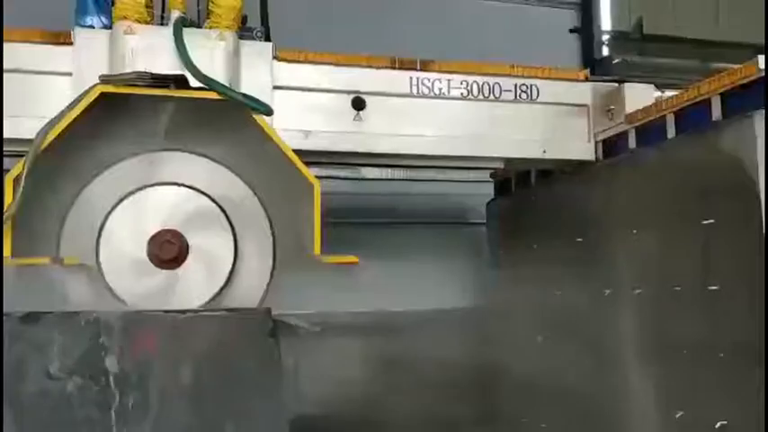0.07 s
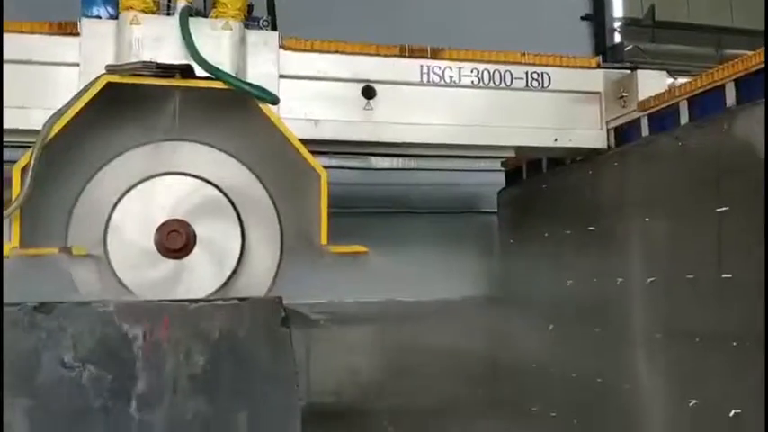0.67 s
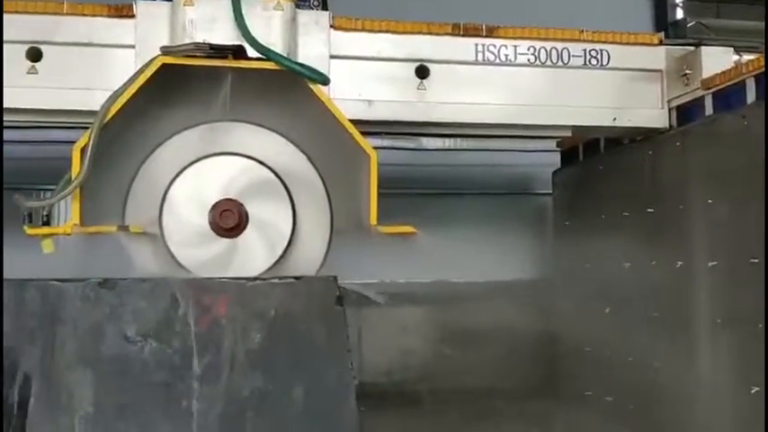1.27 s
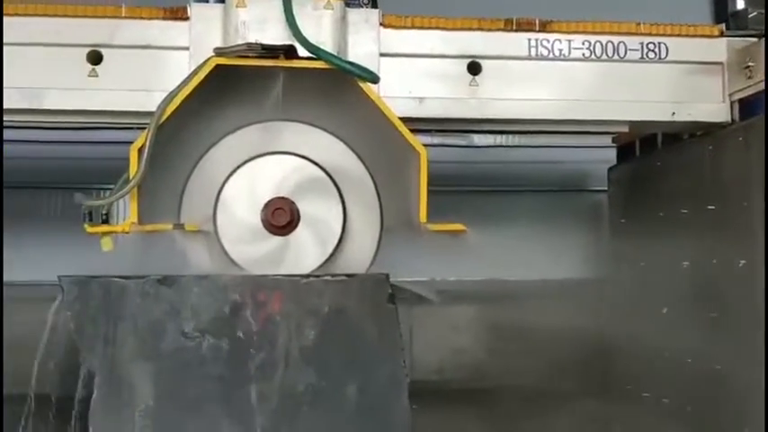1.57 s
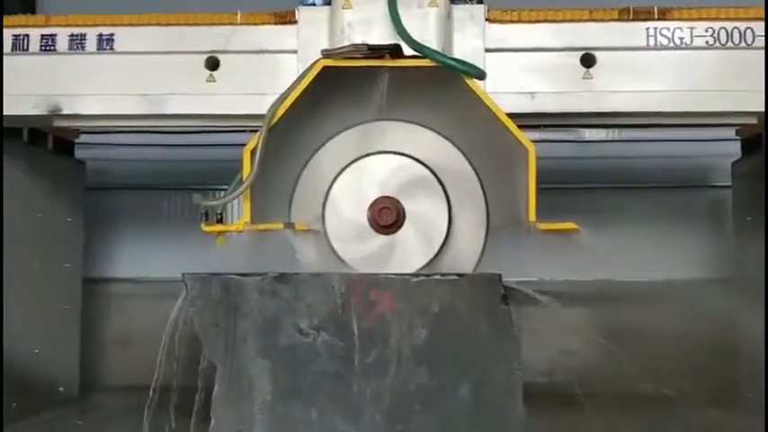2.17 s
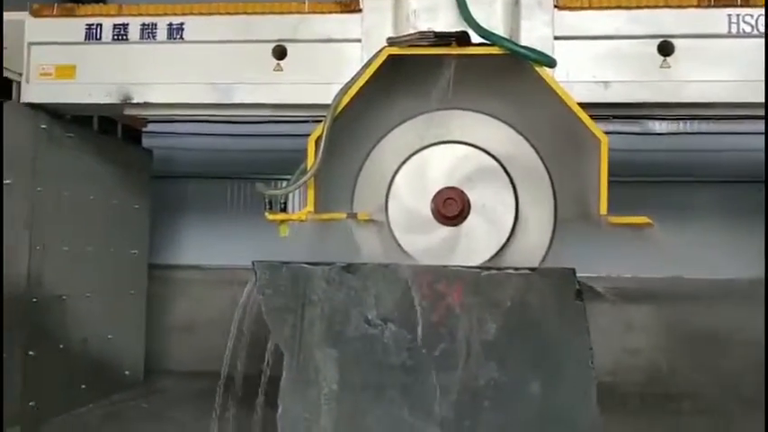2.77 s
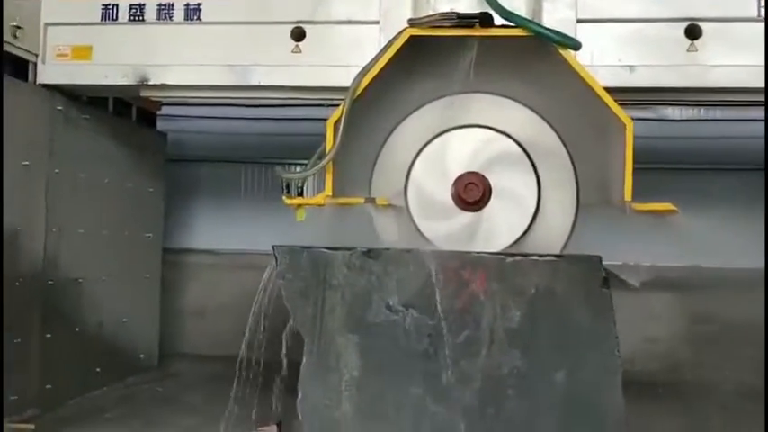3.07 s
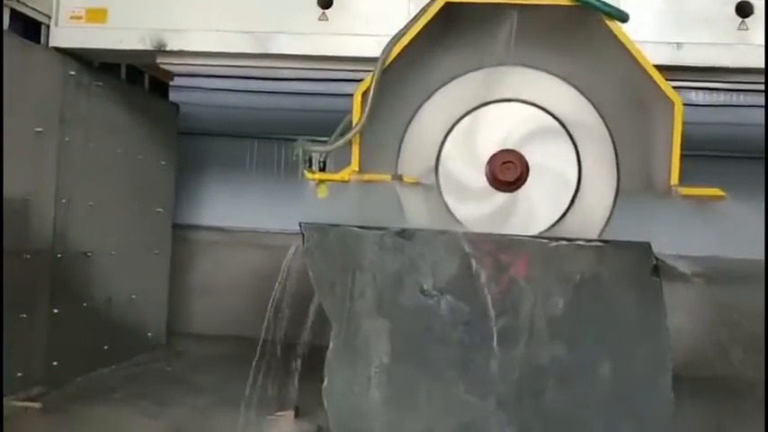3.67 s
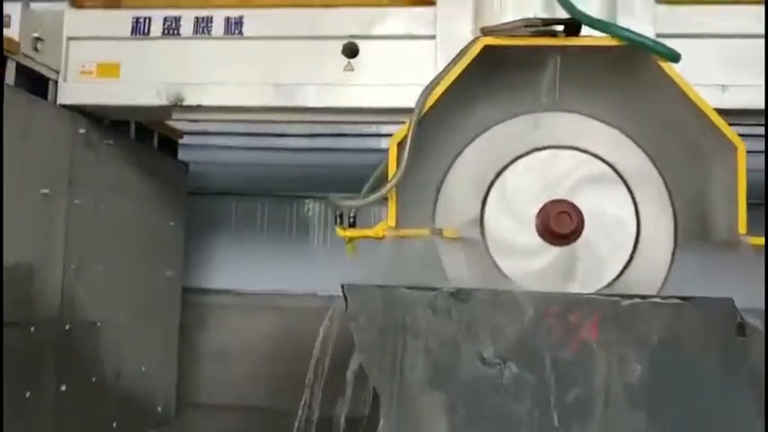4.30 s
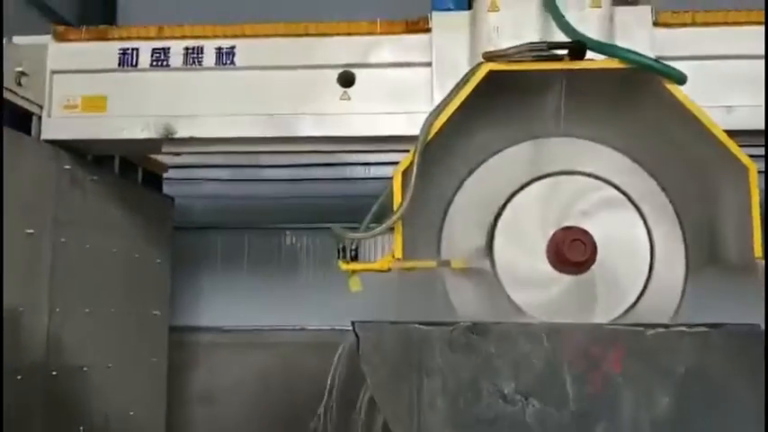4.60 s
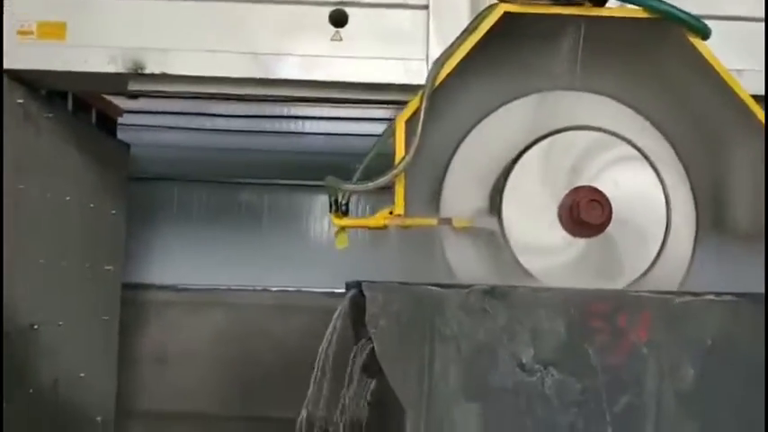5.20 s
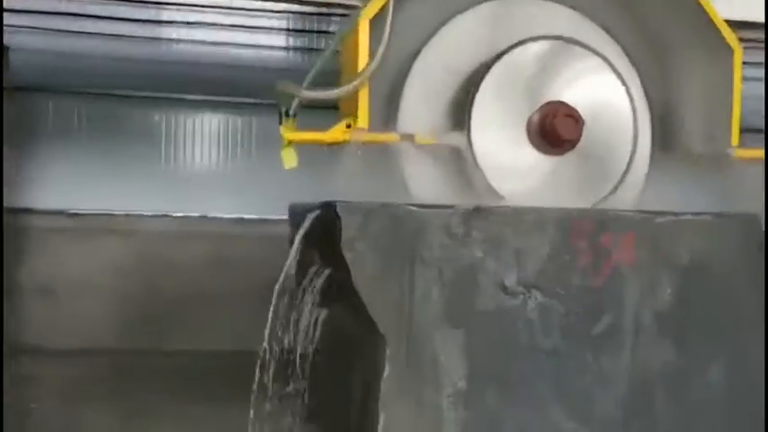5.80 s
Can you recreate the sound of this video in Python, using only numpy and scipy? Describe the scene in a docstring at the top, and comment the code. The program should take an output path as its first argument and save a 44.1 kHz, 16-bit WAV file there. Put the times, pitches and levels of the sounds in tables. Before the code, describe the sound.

A big circular saw cuts a wet stone block in a factory hall, heard from a few metres away. Harsh, gritty grinding and the bright hiss of cooling water run without a break. The steel blade rings and howls with a slowly sliding pitch, while a fast, repeating throb and a motor drone sit underneath. A midrange growl swells past the middle, and a few soft low knocks come through.

```python
"""Crushing stone and hissing water: a big circular saw cuts a wet block in a factory hall.
The microphone is a phone carried slowly past, 3.8 m away at its closest. Diamond grit cracks the stone,
the steel sings, cooling water sprays off the rim and the slot howls. High spots of the rim thump the
blade in the same rhythm on every turn, the flank rubs and whines, and the drive drones underneath,
with a deep rumble at the microphone and a few soft knocks."""
import sys
import numpy as np
from scipy import signal
from scipy.fft import rfft, irfft
from scipy.io import wavfile
from scipy.ndimage import uniform_filter1d, map_coordinates

SR = 44100
rng = np.random.default_rng(int(sys.argv[2]) if len(sys.argv) > 2 else 0)


def pcm_store(signal):
    """Save signal as 16-bit PCM."""
    levels = np.round(np.clip(np.atleast_2d(signal), -1, 1) * 32767)
    wavfile.write(sys.argv[1], SR, levels.astype(np.int16).T)


N = 266805
TIME = np.arange(N) / SR
BIN_HZ = np.maximum(np.arange(N // 2 + 1) * SR / N, 1)
TURN_HZ = 5.2604


def undb(db):
    """Decibels to gain."""
    return 10 ** (np.asarray(db) / 20)


def level(x, db):
    """Scale to unit rms, then apply a steady or moving gain in dB."""
    return x * undb(db) / np.sqrt(np.mean(x ** 2))


def curve(rows):
    """Join (second, value) rows by straight lines."""
    return np.interp(TIME, *np.transpose(rows))


def swells(rows):
    """Smooth rises and dips in dB, one for each row."""
    return sum(db * np.exp(-((TIME - at_s) / half_s) ** 2) for at_s, half_s, db in rows)


def wander(rate_hz):
    """Smooth random drift with a spread near 1."""
    hold = int(SR / rate_hz)
    steps = np.repeat(rng.standard_normal(N // hold + 1), hold)
    return 1.36 * uniform_filter1d(uniform_filter1d(steps, hold), hold)[:N]


def colour(x, points):
    """Filter by a spectrum of (Hz, dB) points."""
    hz, db = np.transpose(points)
    return irfft(rfft(x) * undb(np.interp(np.log(BIN_HZ), np.log(hz), db)), N)


def ring(x, modes):
    """Drive a bank of resonances; neighbours swing in opposite directions."""
    response = sum((-1) ** k * undb(db) / (1 + 1j * (BIN_HZ ** 2 - hz ** 2) / (BIN_HZ * width))
                   for k, (hz, width, db) in enumerate(modes))
    return irfft(rfft(x) * response, N)


def grains(per_s, spread_db):
    """Dense clicks of unequal size and either sign."""
    clicks = (rng.random(N) < per_s / SR) * np.sign(rng.standard_normal(N))
    return level(clicks * undb(spread_db * np.minimum(rng.exponential(size=N), 4)), 0)


def roughness(turn, fresh_db):
    """A rough profile that comes round on every turn, plus a share of fresh noise."""
    size = 2 * int(SR / TURN_HZ / 2)
    profile = irfft(np.exp(2j * np.pi * rng.random(size // 2 + 1)))
    repeated = map_coordinates(profile, [turn % 1 * size], order=1, mode="grid-wrap")
    return level(level(repeated, 0) + undb(fresh_db) * rng.standard_normal(N), 0)


def passing(abreast_s, closest_m=3.8, stroll_m_s=0.46):
    """Gain at the moving microphone: 1 abreast of the source, falling as 1 / distance."""
    return closest_m / np.hypot(closest_m, stroll_m_s * (TIME - abreast_s))


# Crushed stone at the cut. Each row: frequency in Hz, gain in dB.
GRIT_SPECTRUM = [(300, -36), (600, -20.5), (900, -11), (1300, -8.5), (1700, -3.5), (2100, -4.5), (2700, -3),
                 (3250, -5.5), (3900, -4), (4450, -2.5), (4950, -7), (6000, -14), (9000, -25)]
# The singing steel disc. Each row: pitch in Hz, width in Hz, gain in dB.
STEEL_MODES = [(1920, 230, -10), (2026, 107, -3), (2260, 22, -3), (2440, 190, -5), (4180, 190, 1)]

def grinding(force):
    """Grit cracks the stone in tiny bursts; the same uneven load keeps the steel singing."""
    load = force ** 0.051 * undb(0.44 * wander(25.29) + 0.34 * wander(180))
    crush = colour(load * grains(per_s=12000, spread_db=2.5), GRIT_SPECTRUM)
    sing = sum(ring(load * grains(per_s=9000, spread_db=2), [mode]) * undb(wander(6.4))
               for mode in STEEL_MODES)
    sing = colour(sing, [(700, 8), (1600, -3), (4700, -8), (6000, 2.5)])
    return level(level(crush, 0) + level(sing, -9.5), -13.5) * passing(abreast_s=4.5)


# Water off the rim. Each row: frequency in Hz, gain in dB.
SPRAY_SPECTRUM = [(2500, -33), (5300, -8), (6200, -1.5), (7000, 0), (7800, 4.5), (9000, 2), (10400, 2.5),
                  (11000, 4), (11700, 2), (12300, -7), (13300, -3.5), (14000, -6.5)]
# The spray along the walk. Each row: time in seconds, level in dB.
SPRAY_LEVELS = [(.5, -15.5), (3.15, -15), (3.9, -17), (4.9, -15.5), (5.5, -18)]

def spray(force):
    """Water flung off the rim bursts into droplets; the jet flutters."""
    flow = force ** 0.052 * undb(0.4 * wander(16) + 0.49 * wander(150))
    droplets = flow * grains(per_s=22000, spread_db=2.5)
    return level(colour(droplets, SPRAY_SPECTRUM), curve(SPRAY_LEVELS))


# The slot in the block. Each row: time in seconds, pitch in Hz, level in dB.
HOWL_PATH = [(0.699, 2283, -20), (1.601, 2205, -24), (2.1, 2163, -23.5), (2.55, 2000, -20.5),
             (3.1, 1978, -24), (3.65, 1926, -23), (4.301, 2071, -21), (4.9, 2397, -29), (5.499, 2670, -27),
             (5.999, 2310, -23)]

def howl(corner_hz=405):
    """Grit stirs a broad resonance of the slot, whose pitch slides as the blade travels."""
    at_s, hz, db = np.transpose(HOWL_PATH)
    grit = grains(per_s=8000, spread_db=1.5)
    stir = irfft(rfft(grit) / (1 + 1j * BIN_HZ / corner_hz) ** 2, N)
    phase = 2 * np.pi * np.cumsum(np.interp(TIME, at_s, hz)) / SR
    return level(stir * np.sin(phase), np.interp(TIME, at_s, db))


def rubbing(scrape, modes, level_db, flutter_db):
    """The flank scrapes in the slot and rings a few modes, each fed from its own place on the disc."""
    out = 0
    for hz, width, db in modes:
        feed = np.roll(scrape, rng.integers(N))
        wide = 1.55 * width  # two passes narrow the band back to its width
        mode = ring(ring(feed, [(hz, wide, db)]), [(hz, wide, 0)])
        out = out + mode * undb(flutter_db * wander(9))
    return level(out, level_db)


# High and lower rings of the rubbed disc. Each row: pitch in Hz, width in Hz, gain in dB.
HIGH_ZING_MODES = [(4340, 50, 0), (4450, 55, -0.5), (4540, 55, -1.5)]
LOW_ZING_MODES = [(3852, 150, 0)]
# The disc binds or runs free. Each row: centre in seconds, half-length in seconds, change in dB.
BINDING = [(.46, .06, 5), (2.1, 0.073, 2), (2.35, .07, -6), (2.49, 0.046, 5.5), (2.61, 0.046, -9),
           (3.37, 0.064, 5), (3.62, 0.22, 1.5), (5.03, .18, -6), (5.8, 0.31, -3)]
# The lower ring along the walk. Each row: time in seconds, level in dB.
LOW_ZING_LEVELS = [(.65, -28), (.87, -24), (1.1, -25), (2.3, -28), (3.3, -36), (3.75, -38), (3.9, -27),
                   (5.35, -29), (5.9, -33)]

def zing(scrape):
    """The rubbed disc rings in two bands; the higher one flares where the disc binds."""
    high = rubbing(scrape, HIGH_ZING_MODES, -24.5 + swells(BINDING), flutter_db=1.8)
    low = rubbing(scrape, LOW_ZING_MODES, curve(LOW_ZING_LEVELS), flutter_db=2.3)
    return high + low


# The early, middle and late stages of the cut. Each entry: time in seconds.
WEAR_TIMES = [1.1, 2.8, 5]

def wear(stage_db):
    """Gain of a spot that grows or wears down as the cut advances."""
    return undb(np.interp(TIME, WEAR_TIMES, stage_db))


def swings(turn, spots, drift_turns, drift_hz, scatter_db):
    """Each spot swings the blade for a few cycles, a little early or late and never equally hard."""
    out = 0
    for place, half_length, hz, *stage_db in spots:
        turns_past = (turn - place + drift_turns * wander(drift_hz) + .5) % 1 - .5
        strength = wear(stage_db) * undb(scatter_db * wander(5.3))
        envelope = strength * np.exp(-(turns_past / half_length) ** 2)
        out = out + envelope * np.sin(2 * np.pi * hz * turns_past / TURN_HZ)
    return out


# High spots of the rim. Each row: place and half-length in turns, pitch in Hz,
# then early, middle and late strength in dB.
RIM_SPOTS = [(.032, 0.036, 267, -7, -6, -2.5), (0.104, .036, 272, -4, -6, -4),
             (.213, .042, 256, -4, -3, -2), (.306, .049, 255, -2.5, -1.5, 1),
             (.42, 0.044, 255, -10, -4.5, -1.5), (.53, .05, 251, -2.5, -0.5, -1.5),
             (.594, 0.036, 253, -2.5, 2, 1), (0.711, 0.027, 277, -9, -11, -6),
             (.78, 0.038, 250, -8, -4.5, -7), (0.974, 0.049, 254, -6.5, -2.5, -3.5)]

def thumps(turn):
    """Each high spot strikes the stone and thumps the blade once a turn."""
    return level(swings(turn, RIM_SPOTS, drift_turns=0.0038, drift_hz=1.2, scatter_db=1.4), -26.3)


def cutting_force(turn):
    """The force rises whenever a high spot meets the stone."""
    bumps = 0
    for place, half_length, _, *stage_db in RIM_SPOTS:
        turns_past = (turn - place + .5) % 1 - .5
        bumps = bumps + wear(stage_db) * np.exp(-(turns_past / half_length) ** 2)
    return level(1 + 0.49 * bumps, 0)


# Low resonances of blade and guard. Each row: pitch in Hz, width in Hz, gain in dB.
DRUM_MODES = [(214, 17, -9), (255, 37, -6.5), (332, 42, -7), (420.6, 49, -9.5), (738, 60, -9),
              (845, 47, -12), (1132, 94, -18.5)]

def drumming(turn, force):
    """The rim beats the deepest modes; loose chips stir the higher ones."""
    rim = ring(force * undb(0.35 * wander(5)) * roughness(turn, fresh_db=1.5), DRUM_MODES[:3])
    chips = ring(force ** 0.081 * roughness(turn, fresh_db=2.5), DRUM_MODES[3:])
    # the two faces of the disc cancel at long wavelengths
    radiated = colour(rim + chips, [(80, -12), (175, 7), (215, -4), (1300, 0.5), (3000, -12)])
    return level(radiated, -27) * passing(abreast_s=2.7)


# Rubbing spots of the flank. Each row: place and half-length in turns, pitch in Hz,
# then early, middle and late strength in dB.
FLANK_SPOTS = [(.02, 0.09, 830, -17, -11, -2), (.2, 0.055, 780, -4, -3, -1), (.35, 0.079, 838, -7, -7, 2),
               (.51, .07, 835, -6, -3, 0.5), (.68, .05, 835, -16, -7, -1), (.78, 0.038, 834, -17, -5, 0)]

def whine(turn):
    """Each spot on the flank rubs the slot and whines once a turn."""
    return level(swings(turn, FLANK_SPOTS, drift_turns=0.0028, drift_hz=6, scatter_db=2.5), -34.5)


# The flank's low note. Each row: pitch in Hz, width in Hz, gain in dB.
HUM_MODES = [(423.3, 17.4, 0)]

def hum(waviness, growth_db_s=0.5):
    """The wavy flank rubs up a hum that slowly grows."""
    return rubbing(waviness, HUM_MODES, -37.5 + growth_db_s * TIME, flutter_db=2)


# The guard's midrange. Each row: pitch in Hz, width in Hz, gain in dB.
GUARD_MODES = [(740, 113, -0.5), (872, 100, -1.5), (964, 70, -8), (1090, 160, -4.5)]

def growl(waviness, peak_s=3.95, half_s=1, rise_db=9.5):
    """The rubbing makes the guard growl, with one long swell."""
    return rubbing(waviness, GUARD_MODES, -37 + swells([(peak_s, half_s, rise_db)]), flutter_db=1.3)


# The drive's drone. Each row: frequency in Hz, gain in dB.
DRIVE_SPECTRUM = [(20, -34), (55, -26), (80, -4), (120, 3.5), (160, 9), (190, 5), (300, -6), (600, -23)]

def drive(turn):
    """Motor and belt drone, partly in step with the spindle."""
    return level(colour(roughness(turn, fresh_db=-1.5), DRIVE_SPECTRUM), -40.5)


# A deep rumble at the microphone. Each row: frequency in Hz, gain in dB.
RUMBLE_SPECTRUM = [(20, -26), (45, -22), (75, -5), (130, 4), (200, 1), (400, -36)]
# Its surges. Each row: centre in seconds, half-length in seconds, rise in dB.
RUMBLE_SWELLS = [(1.45, .35, 8), (5.28, 0.079, 7), (6.0, 0.13, 18.5)]

def rumble():
    """Deep noise at the microphone that swells now and then."""
    deep = colour(rng.standard_normal(N), RUMBLE_SPECTRUM)
    return level(deep, -49.5 + swells(RUMBLE_SWELLS)) * undb(2.6 * wander(8))


# A dip in the hiss at the microphone. Each row: time in seconds, centre in Hz.
HOLLOW_PATH = [(2.2, 6170), (4.2, 6440), (5.2, 6980)]

def hollow(x, width_hz=450, depth_db=-2.5):
    """One weakened band of the hiss slides upward as the microphone moves."""
    carrier = np.exp(2j * np.pi * np.cumsum(curve(HOLLOW_PATH)) / SR)
    lowpass = signal.butter(1, width_hz / 2, fs=SR)
    band = 2 * np.real(carrier * signal.lfilter(*lowpass, x / carrier))
    return x - (1 - undb(depth_db)) * band


def echoes(x, echo_db=-21, sway_s=0.00015):
    """Reflections off the block, guard and splash walls; their paths shift as the microphone moves."""
    out = x
    for lag_s in rng.uniform(0.002015, .03, size=6):
        out = out + undb(echo_db) * np.interp(TIME - lag_s - sway_s * wander(0.702), TIME, x)
    return out * x.std() / out.std()


# Soft knocks under the drone. Each row: time of the peak in seconds, level in dB.
LOW_KNOCKS = [(1.078, -42), (1.255, -31), (1.585, -35), (1.697, -32), (1.89, -34), (2.847, -35),
              (3.209, -35), (3.395, -39), (5.243, -30), (5.329, -32), (5.884, -35), (5.978, -40)]

def knocks(typical_hz=94, rise_s=0.0098):
    """Dull bumps of two or three cycles, each at a slightly different pitch."""
    out = 0
    for peak_s, db in LOW_KNOCKS:
        hz = typical_hz * np.exp(0.18 * rng.standard_normal())
        age = np.maximum(TIME - peak_s + rise_s, 0)
        envelope = (age / rise_s * np.exp(1 - age / rise_s)) ** 2
        out = out + undb(db) * envelope * np.sin(2 * np.pi * hz * age)
    return out


def scene():
    """The blade turns at a nearly even speed, heard in mono; only the bright sounds echo."""
    turn = TURN_HZ * TIME + 0.00099 * wander(1.52)  # revolutions so far
    force = cutting_force(turn)
    waviness = roughness(turn, fresh_db=2.5)
    scrape = rng.standard_normal(N)
    blade = thumps(turn) + whine(turn) + hum(waviness) + growl(waviness)
    ringing = zing(scrape)
    low = blade + drumming(turn, force) + drive(turn) + rumble() + knocks()
    bright = grinding(force) + howl() + ringing + spray(force)
    mono = low + echoes(hollow(bright))
    return np.array([mono, mono])


def record(dry, start_s=0.16, fade_s=0.25, gain_db=-2, ceiling=0.9, top_hz=14100):
    """At the phone: a short fade-in, rounding of the tallest peaks and a steep cut of the top."""
    fade = np.interp(TIME - start_s, [0, fade_s], [undb(-16.5), 1], left=0)
    faded = dry * fade * undb(gain_db)
    rounded = faded / (1 + (faded / ceiling) ** 8) ** (1 / 8)
    return signal.sosfilt(signal.ellip(10, .1, 70, top_hz, fs=SR, output="sos"), rounded)


dry = scene()
out = record(dry)
pcm_store(out)
```